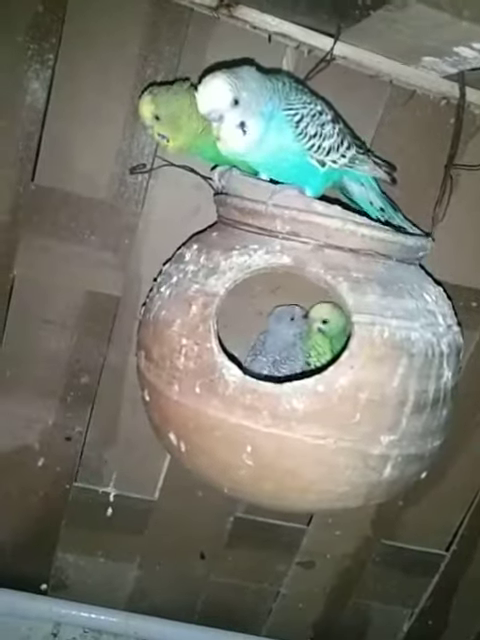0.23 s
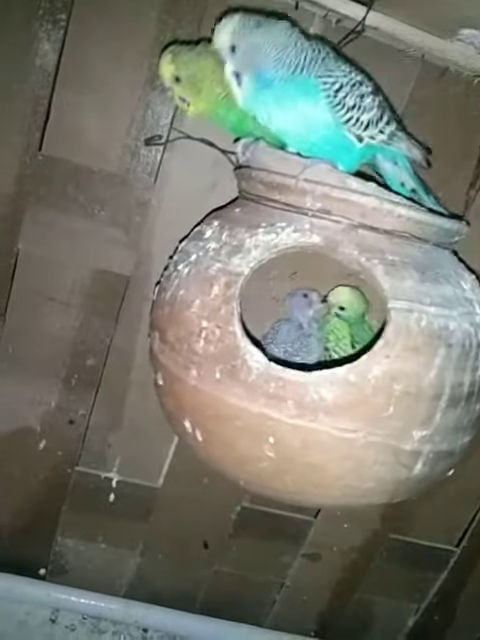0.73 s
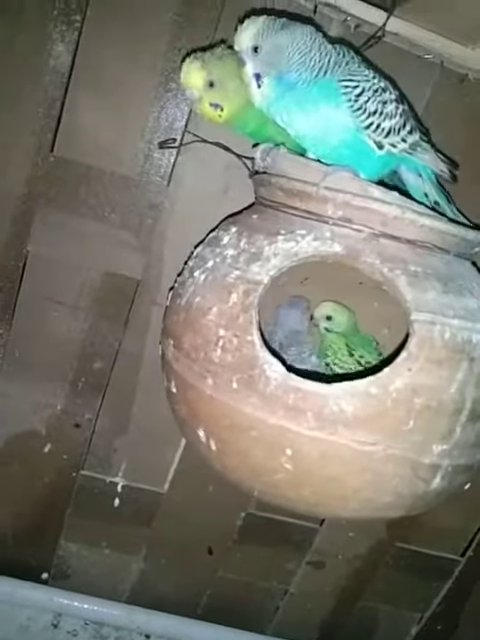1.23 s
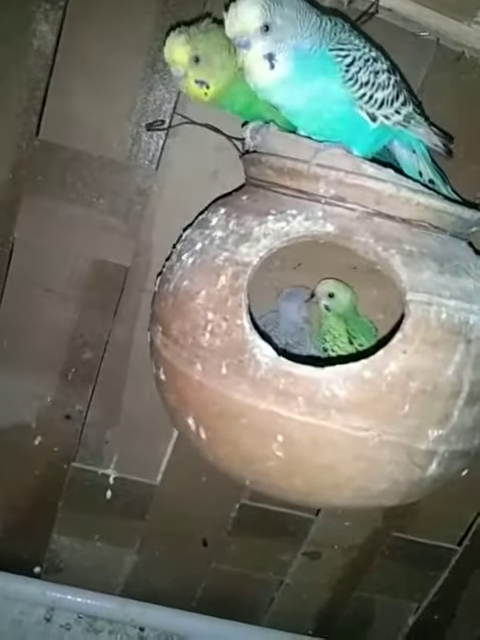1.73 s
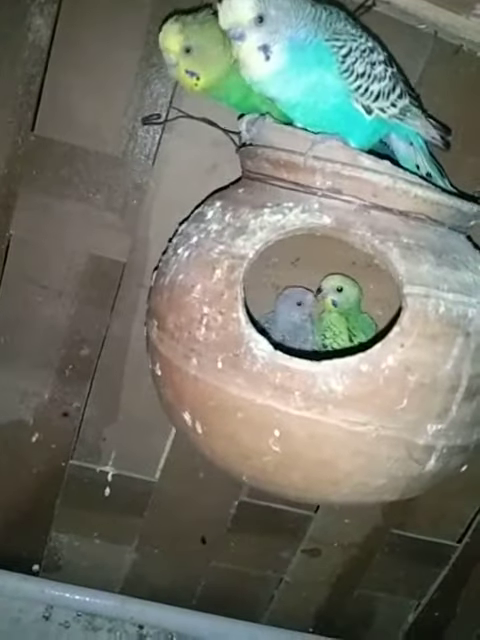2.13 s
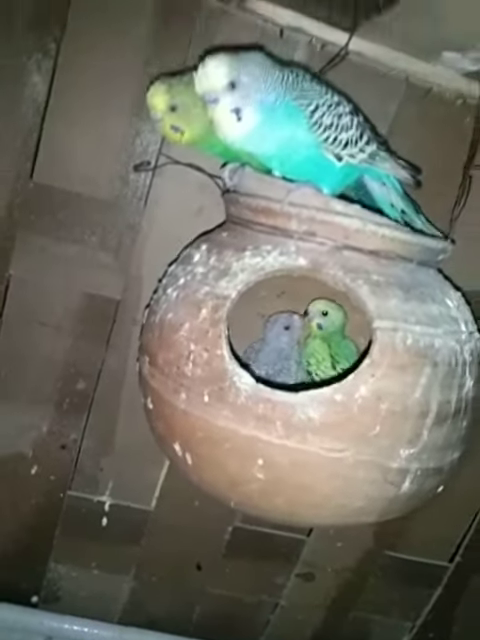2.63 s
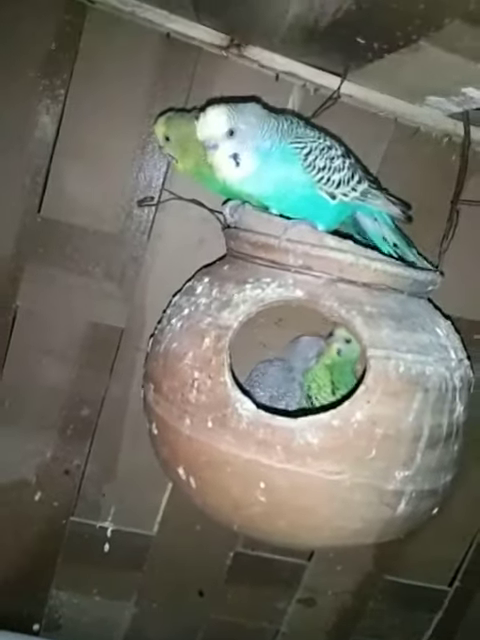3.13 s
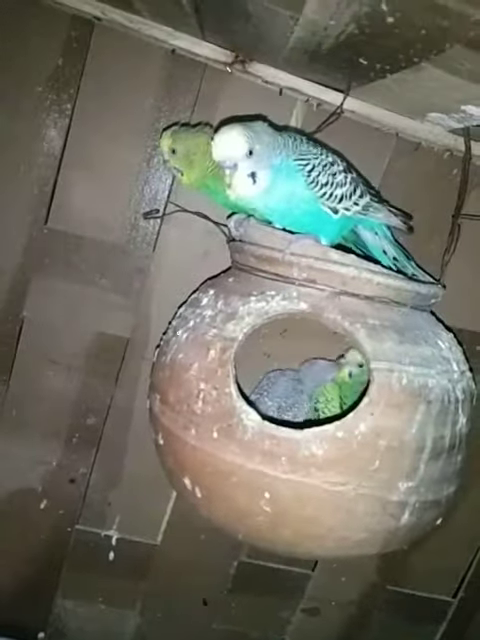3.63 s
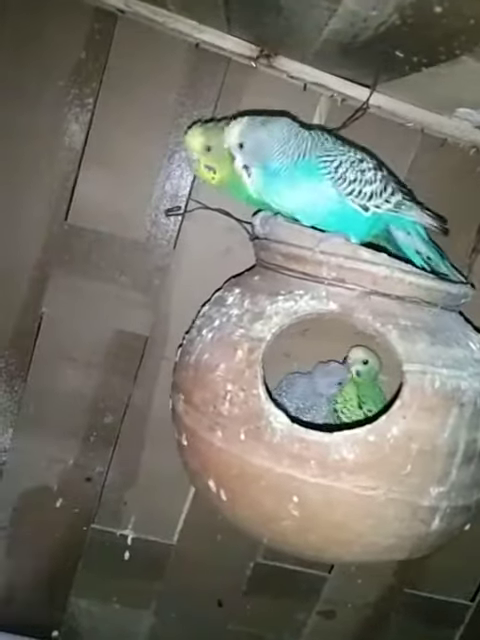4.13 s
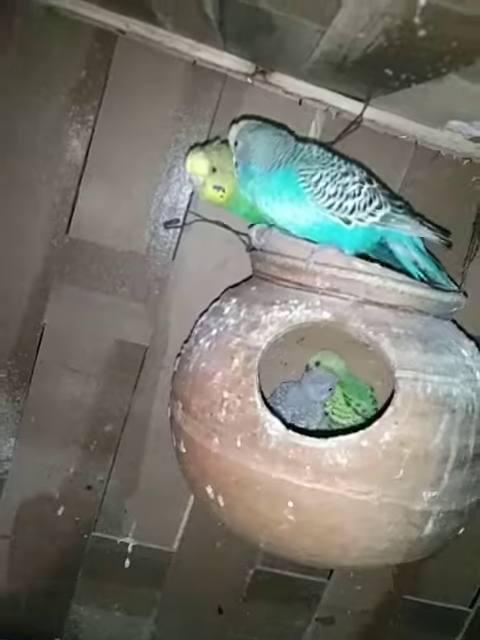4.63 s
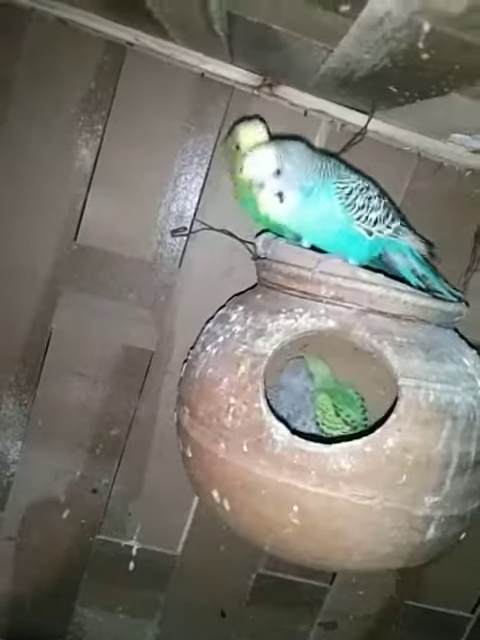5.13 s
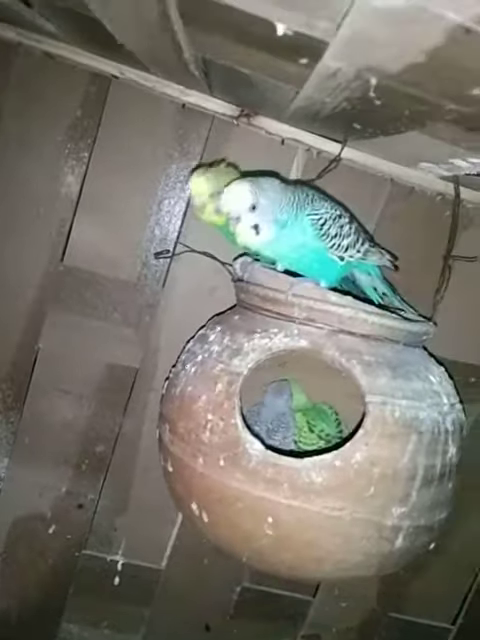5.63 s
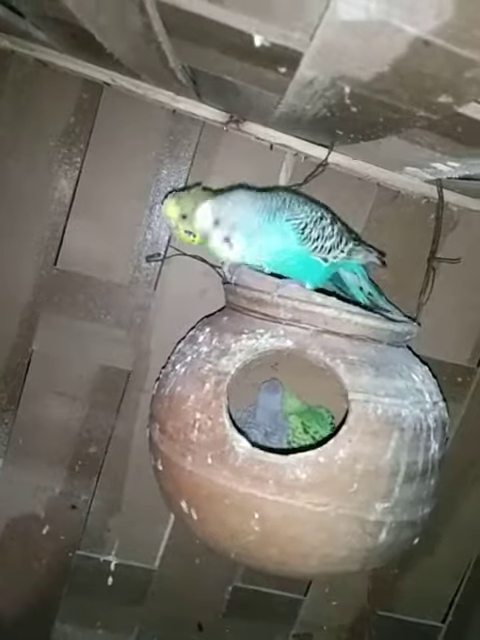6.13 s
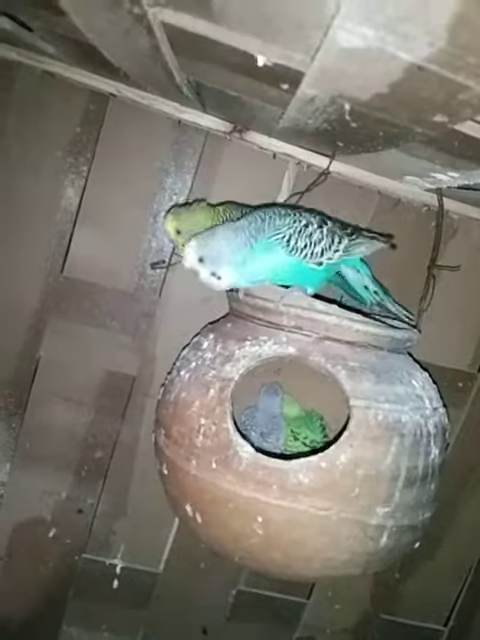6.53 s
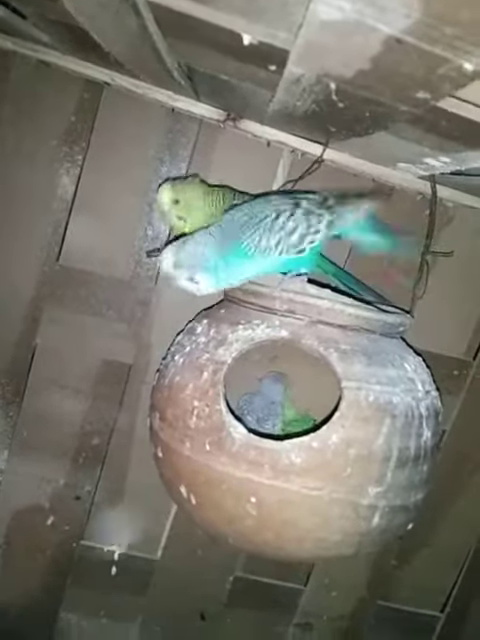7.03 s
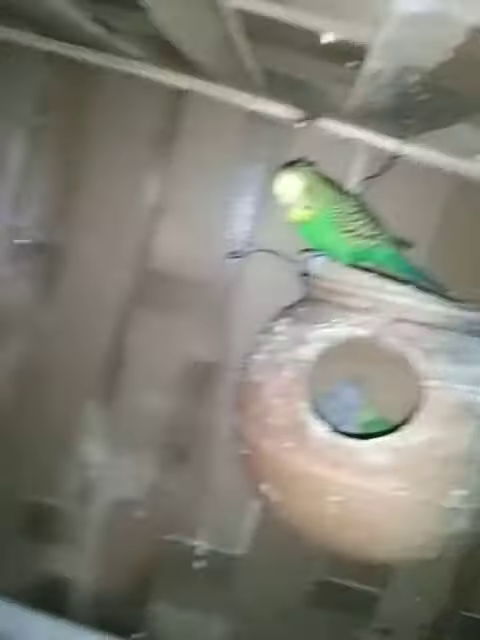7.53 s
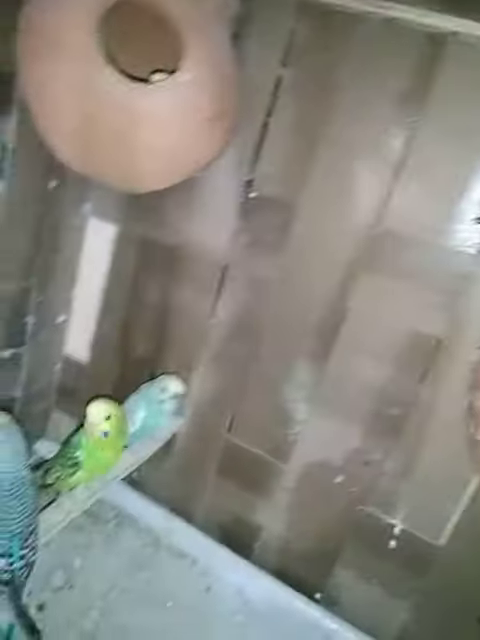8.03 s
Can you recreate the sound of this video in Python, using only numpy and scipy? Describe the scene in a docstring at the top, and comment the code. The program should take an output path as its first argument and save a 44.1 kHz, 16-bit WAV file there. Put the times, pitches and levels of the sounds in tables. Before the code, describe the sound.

A small parrot close by warbles, squawks and clucks in short lively bursts, chicks peep faintly from a clay pot, then wings flutter past.

```python
"""Budgerigars in a small brick aviary

A close bird warbles in gliding sine tones with overtones, squawks with trembling tones and rasping noise,
and clucks in short puffs of noise. Chicks peep from a clay nest pot: thin arching tones, run together.
Near the end a bird flies off past the microphone, in beating noise. Below lie a wavering hum, a low
rumble with soft bumps, and the drone of a motor far away. Random echoes add the walls.
"""
import sys
import numpy as np
from scipy import signal
from scipy.fft import rfft, irfft
from scipy.io import wavfile

SR = 44100
rng = np.random.default_rng(int(sys.argv[2]) if len(sys.argv) > 2 else 0)


def unload_wav(signal):
    """Save mono or channel-first audio to the path in sys.argv[1] as 16-bit WAV at rate SR, clipped to [-1, 1]."""
    wavfile.write(
        sys.argv[1],
        SR,
        np.round(np.clip(np.atleast_2d(signal).T, -1, 1) * 32767).astype(np.int16),
    )


N = 365148
TIME = np.arange(N) / SR


def from_db(db):
    """Turn decibels into a gain."""
    return 10 ** (np.asarray(db) / 20)


def rms_one(x):
    """Scale to unit power."""
    return x / np.sqrt(np.mean(np.abs(x) ** 2) + 1e-20)


def in_time(rows):
    """Draw each column of a table as a curve with a value at every sample."""
    seconds, *columns = np.transpose(rows)
    return [np.interp(TIME, seconds, column) for column in columns]


def add(out, start, sound):
    """Mix a sound in at a start time in seconds."""
    i = max(0, round(start * SR))
    out[i:i + len(sound)] += sound[:len(out) - i]


def wander(rate_hz, size):
    """Smooth random motion around zero, of unit power: a higher rate moves faster."""
    r = np.exp(-2 * np.pi * rate_hz / SR)
    settling = 8000  # samples dropped while the filter starts up
    motion = signal.lfilter([1], [1, -2 * r, r * r], rng.standard_normal(size + settling))
    return rms_one(motion[settling:])


def noise(spectrum):
    """Noise of unit power, shaped by a table of frequencies and levels."""
    table_hz, db = np.transpose(spectrum)
    hz = np.fft.rfftfreq(N, 1 / SR) + 1  # plus 1 avoids the logarithm of zero
    low_cut = hz / (hz + 20)
    gain = from_db(np.interp(np.log(hz), np.log(table_hz), db)) * low_cut
    return rms_one(irfft(rfft(rng.standard_normal(N)) * gain, N))


def cycles(hz):
    """Running phase of a moving frequency."""
    return 2 * np.pi * np.cumsum(hz) / SR


def gesture(length, pitches, attack, release):
    """One push of air: pitch bends through three points while the pressure rises, holds and lets go."""
    t = np.arange(int((length + 4 * release) * SR)) / SR
    bend = np.polyfit([0, .5, 1], pitches, 2)
    pitch = np.polyval(bend, np.minimum(t / length, 1))
    rise = 1 - np.exp(-(t / attack) ** 2)
    fall = np.exp(-np.maximum(t - length + release, 0) / release)
    return pitch, rise * fall


def puff(t, decay):
    """Strength of a short burst: it peaks at 1 after the decay time, then dies away."""
    return (t / decay) * np.exp(1 - t / decay)


def run_of(start, length, typical, unevenness=.18):
    """Split a bout into sounds of about the typical length, without gaps: starts and lengths."""
    count = max(1, round(length / typical))
    shares = np.exp(unevenness * rng.standard_normal(count))
    lengths = length * shares / shares.sum()
    return start + np.cumsum(lengths) - lengths, lengths


# Whistled notes that stand out of the warble: (time [s], length [s], start pitch [Hz], end pitch [Hz],
# relative level [dB], overtones relative to the note [dB])
WHISTLE_NOTES = [(.243, .033, 1605, 1404, -44.5, -2), (.278, 0.027, 1266, 1520, -38.5, -4),
                 (.32, 0.019, 1590, 1104, -45, -1.5), (0.412, 0.044, 870, 1362, -42, 0.5),
                 (.488, 0.041, 940, 1160, -55, -5.5), (0.548, 0.034, 1280, 1663, -44, 0.5),
                 (.706, .019, 2230, 3004, -31, 5.5), (1.138, .028, 3540, 2396, -25.5, -11),
                 (1.155, .023, 3140, 3990, -26.5, -21), (1.19, 0.036, 3020, 2876, -25, -24),
                 (2.332, 0.012, 2470, 2340, -28, 2), (2.376, 0.16, 1830, 1874, -45, -13),
                 (2.459, 0.063, 1680, 1396, -31, -4.5), (2.503, 0.022, 3060, 3770, -26, -7),
                 (2.567, 0.039, 2775, 3100, -28, -21), (2.641, 0.037, 1310, 2190, -31, -4),
                 (2.708, 0.028, 2710, 2500, -31, -15), (2.737, 0.041, 1822, 1410, -31.5, -10.5),
                 (2.776, .047, 1500, 1295, -33.5, -8), (2.965, 0.052, 3000, 1319, -30, -17.5),
                 (3.129, 0.045, 2715, 3150, -23, -27), (3.2, 0.04, 2015, 1340, -37.5, -1),
                 (3.272, 0.033, 2470, 3080, -26.5, -35), (3.311, 0.026, 2630, 2641, -23, -37),
                 (3.639, 0.086, 2795, 1455, -40, -7), (3.73, 0.027, 2970, 3633, -20, -17),
                 (3.765, 0.045, 3520, 2162, -19.5, -17.5), (3.797, 0.039, 2427, 3480, -19.5, -19),
                 (3.834, 0.033, 3160, 3055, -14.5, -13), (3.87, 0.054, 2263, 2926, -15.5, -13.5),
                 (4.142, 0.037, 3620, 3076, -25.5, 3), (4.179, 0.035, 3490, 3570, -19.5, -12.5),
                 (4.232, 0.046, 3077, 3104, -20.5, -19.5), (4.251, .041, 2840, 2436, -25, -5),
                 (4.293, 0.02, 2285, 1797, -46, 13), (4.627, 0.076, 3210, 1756, -39, -4),
                 (4.711, 0.053, 2690, 2403, -30, -6), (4.829, 0.038, 3320, 1960, -33, -4.5),
                 (4.903, 0.033, 3388, 3296, -19.5, -20), (4.932, .025, 2240, 3050, -26, -18),
                 (4.958, 0.024, 1633, 1480, -41, -4), (5.055, .032, 1727, 1390, -40, 0),
                 (5.145, 0.033, 1590, 1423, -40.5, -5), (5.187, .056, 2910, 1804, -40, -4),
                 (5.349, 0.067, 2800, 1466, -47.5, -9.5), (6.023, .072, 1667, 1365, -39.5, -7),
                 (6.86, 0.014, 3295, 3094, -32.5, -12.5), (6.882, 0.067, 4620, 2330, -32.5, -10.5),
                 (6.977, 0.041, 2972, 2953, -22, -7), (7.01, .037, 2587, 2554, -26, -5.5),
                 (7.081, 0.037, 2642, 3345, -24, -7.5), (7.45, 0.069, 1523, 1334, -33, -1.5),
                 (7.525, 0.039, 3060, 2370, -24.5, 0), (7.552, 0.034, 2973, 3216, -18, -22.5),
                 (7.6, 0.027, 1624, 1423, -38.5, -14), (7.672, 0.067, 1850, 1578, -38, 5)]


def whistles():
    """Clear notes: the longer and stronger a note is, the cleaner it sounds."""
    onset_rough, settle_s = .7, .06
    firm_db, rough_doubles_db = -25.5, 22.5  # roughness doubles for each 22.5 dB below a firm whistle
    notes = []
    for start, length, first_hz, last_hz, db, overtones_db in WHISTLE_NOTES:
        weakness = 2 ** ((firm_db - db) / rough_doubles_db)
        rough = min(1, onset_rough * np.exp(-length / settle_s) * weakness)
        notes.append((start, length, first_hz, last_hz, db, overtones_db, rough))
    return notes


# Bouts of softer chatter around the whistles: (time [s], length [s], central pitch [Hz], relative level [dB])
CHATTER_BOUTS = [(1.117, 0.069, 2434, -32.5), (2.45, .26, 2390, -35.5), (2.881, 0.24, 2197, -34.5),
                 (3.135, 0.19, 2353, -35), (3.529, 0.11, 1996, -49.5), (3.805, 0.019, 1904, -27),
                 (4.19, .065, 2435, -26), (4.715, .05, 2950, -32.5), (6.937, 0.067, 2290, -35),
                 (7.435, 0.026, 2600, -33)]
# Turning points of the chatter's pitch, in turn low, high, middle: (position in the swing [-1 to 1])
PITCH_TURNS = [-1, 1, 0]


def chatter():
    """Hoarse syllables join into a zigzag: each glides on from the pitch where the last one ended."""
    syllable_s, spread_db, rough = .041, 2, .62
    swing_oct, pitch_spread_oct = .36, .12
    # the further under the throat's resonance, the stronger the overtones
    throat_hz, throat_overtones_db, overtones_db_per_oct = 3110, -15.5, 11.5
    notes = []
    for bout_start, span, centre_hz, db in CHATTER_BOUTS:
        starts, lengths = run_of(bout_start, span, syllable_s)
        height, force = rng.standard_normal((len(starts) + 1, 2)).T
        # up in one syllable and down over two, with some chance in every turning point
        turns_oct = swing_oct * np.resize(PITCH_TURNS, len(height)) + pitch_spread_oct * height
        turns_hz = centre_hz * 2 ** turns_oct
        for start, length, first_hz, last_hz, push in zip(starts, lengths, turns_hz, turns_hz[1:], force):
            octaves_under = np.log2(throat_hz / np.sqrt(first_hz * last_hz))
            overtones_db = throat_overtones_db + overtones_db_per_oct * octaves_under
            notes.append((start, length, first_hz, last_hz, db + spread_db * push, overtones_db, rough))
    return notes


# Weight of the warble's overtones: (multiple of the pitch, relative level [dB])
OVERTONE_WEIGHTS = [(2, 1), (3, -5.5), (4, -16.5), (5, -11.5)]
# Tone colour of the air noise in warble and clucks: (frequency [Hz], relative level [dB])
AIR_SPECTRUM = [(300, -27), (700, -25), (1400, -2), (2600, 5.5), (4500, 5), (7000, -2), (10000, -19),
                (15000, -45)]


def warble(jitter=.059, jitter_hz=420, shimmer_db=6, flicker_db=5.5, hiss_db=-15):
    """Gliding notes; roughness shakes pitch and strength, wakes a second voice and lets air noise through."""
    voiced, hiss = np.zeros(N), np.zeros(N)
    quaver, twin_share, twin_spread = .04, .65, .17
    glide_done = .7  # share of its glide that a note has covered half way through
    for start, length, first_hz, last_hz, db, overtones_db, rough in whistles() + chatter():
        pitches = first_hz, first_hz + glide_done * (last_hz - first_hz), last_hz
        pitch, pressure = gesture(length + .002, pitches, attack=.0027, release=.003)
        n = len(pitch)
        fast_shake = jitter * rough * wander(jitter_hz, n)
        slow_shake = quaver * np.sqrt(rough) * wander(110, n)
        phase = cycles(pitch * (1 + fast_shake + slow_shake))
        upper = 0
        for multiple, weight_db in OVERTONE_WEIGHTS:
            # each overtone flares on its own as the throat moves; little passes above 9 kHz
            flare = rms_one(from_db(flicker_db * wander(67, n)))
            top_cut = 1 / np.sqrt(1 + (multiple * pitch / 9000) ** 20)
            upper = upper + from_db(weight_db) * flare * np.sin(round(multiple) * phase) * top_cut
        # a second membrane slips out of step and wanders above and across the first
        twin_hz = pitch * np.exp(twin_spread * (.5 + wander(35, n)))
        twin = np.sin(cycles(twin_hz)) * rms_one(from_db(flicker_db * wander(90, n)))
        voice = np.sin(phase) + from_db(overtones_db) * upper + twin_share * rough * twin
        shimmer = rms_one(from_db((-.5 + shimmer_db * rough) * wander(260, n)))
        add(voiced, start, from_db(db) * pressure * shimmer * voice * np.sqrt(2))
        add(hiss, start, from_db(db + hiss_db) * rough * pressure)
    return voiced + hiss * noise(AIR_SPECTRUM)


# Harsh squawks: (time [s], length [s], middle pitch [Hz], relative level of the octave [dB])
SQUAWK_CALLS = [(0.587, 0.051, 3290, -14), (0.71, 0.052, 3225, -16), (.796, .064, 3010, -16),
                (0.857, 0.051, 3220, -16), (0.958, .048, 3007, -16), (1.055, .071, 3060, -15),
                (1.232, 0.051, 3287, -15.5), (1.328, 0.064, 3134, -16), (3.946, 0.043, 3263, -14.5),
                (4.05, .097, 2874, -15.5), (4.77, 0.051, 3064, -14), (4.866, 0.052, 3303, -15.5),
                (4.972, 0.089, 3270, -15), (5.095, 0.056, 3080, -17), (5.25, 0.099, 2990, -17.5),
                (7.091, .04, 3054, -15.5), (7.307, 0.045, 2928, -14.5)]
# Tone colour of the rasp in squawks and peeps: (frequency [Hz], relative level [dB])
RASP_SPECTRUM = [(150, -21), (900, -24), (1500, -13), (2200, -16), (3400, 9.5), (4500, -1.5), (6000, -2),
                 (7500, 1), (8800, -1.5), (10500, -10.5), (13000, -19), (16000, -30)]


def squawks(rattle_hz=175, rattle_depth=.3, buzz_hz=680, buzz_depth=.65, swell=.008, release=.005):
    """The voice organ vibrates chaotically: two smeared tones and a wide rasp, chopped by an uneven rattle."""
    voiced, rasp = np.zeros(N), np.zeros(N)
    climb = .045  # share by which the pitch rises during a squawk
    rasp_db = -7
    # (multiple of the pitch, smearing rate in Hz, level in dB)
    partials = ((1, 150, -19), (2, 210, 0))
    for start, length, hz, octave_db in SQUAWK_CALLS:
        pitches = hz * (1 + climb * np.linspace(-.5, .5, 3))
        pitch, pressure = gesture(length + .005, pitches, attack=.0055, release=release)
        n = len(pitch)
        # a slower vibration bends the pitch to and fro, which splits each partial into sidebands
        buzz = cycles(buzz_hz * rng.uniform(.8, 1.25) * (1 + .074 * wander(40, n)))
        phase = cycles(pitch * (1 + .01864 * wander(49, n))) + buzz_depth * np.sin(buzz)
        slow_start = 1 - .7 * np.exp(-np.arange(n) / SR / swell)
        rattle = 1 + rattle_depth * np.cos(cycles(rattle_hz * (1 + .28 * wander(70, n))))
        pressure = pressure * slow_start * rattle
        for multiple, smear_hz, db in partials:
            cosine_part = wander(smear_hz, n) * np.cos(multiple * phase)
            sine_part = wander(smear_hz, n) * np.sin(multiple * phase)
            add(voiced, start - .004, from_db(octave_db + db) * pressure * (cosine_part + sine_part))
        add(rasp, start - .004, from_db(octave_db + rasp_db) * pressure)
    high_pass = signal.butter(2, 1500, "high", fs=SR, output="sos")
    return signal.sosfilt(high_pass, voiced) + rasp * noise(RASP_SPECTRUM)


# Dry clucks between the notes: (time [s], relative level [dB])
CLUCK_TIMES = [(0.258, -30.5), (0.415, -28), (2.225, -31), (2.238, -41), (2.271, -13), (2.279, -31),
               (2.337, -19), (2.346, -35), (2.445, -17), (2.883, -27.5), (3.518, -35.5), (4.55, -18),
               (5.196, -30), (5.228, -34), (6.864, -38), (7.439, -14), (8.01, -30.5)]


def clucks(decay=.0053, level_db=-9):
    """Single puffs of air noise that swell and fade within milliseconds."""
    puffs = np.zeros(N)
    t = np.arange(SR // 20) / SR
    for start, db in CLUCK_TIMES:
        add(puffs, start - .001, from_db(db + level_db) * puff(t, decay))
    return puffs * noise(AIR_SPECTRUM)


# The chicks beg in runs of peeps: (time [s], length [s], relative level [dB])
BEGGING_RUNS = [(0.052, 0.12, -63.5), (0.177, 0.21, -56), (1.486, 0.17, -58), (2.059, 0.16, -58.5),
                (3.361, 0.094, -48), (4.343, 0.22, -54.5), (5.427, 0.15, -56.5), (5.817, .223, -53.5),
                (6.249, 0.22, -48.5), (6.535, 0.35, -51.5), (7.773, 0.34, -53)]


def peeps():
    """Every run of begging is an uneven chain of peeps, the hurried ones higher."""
    typical_s, typical_hz = .062, 3810  # length and top pitch of a typical peep
    unevenness, hurry, spread_db = .3, .1, 2
    rows = []
    for run_start, span, db in BEGGING_RUNS:
        starts, lengths = run_of(run_start, span, typical_s, unevenness)
        tops_hz = typical_hz * (typical_s / lengths) ** hurry
        levels_db = db + spread_db * rng.standard_normal(len(starts))
        rows += zip(starts, lengths, tops_hz, levels_db)
    return rows


def chicks(dip_hz=3060, octave_db=-12, half_db=-23, dip_jitter=.048, rasp_db=-20, level_db=4):
    """Each peep arches up from a hoarse low pitch and drops back; run together they make a thin trill."""
    voiced, rasp = np.zeros(N), np.zeros(N)
    waver, flicker_db, fade = .03, 3, .009
    for start, length, top_hz, db in peeps():
        n = int((length + fade) * SR)
        t = np.arange(n) / SR
        # 1 at both ends of the peep, 0 in its middle
        dip = np.abs(np.cos(np.pi * np.linspace(0, 1, n))) ** 3
        arch_hz = top_hz + (dip_hz - top_hz) * dip
        shake = waver * wander(62, n) + dip_jitter * dip * wander(1200, n)
        phase = cycles(arch_hz * (1 + shake))
        fades = np.sqrt(np.clip(np.minimum(t, t[::-1]) / fade, 0, 1))
        strength = fades * from_db(db + level_db + flicker_db * wander(70, n))
        # in the dips the voice breaks to half its pitch
        half_pitch = from_db(half_db) * dip * np.sin(phase / 2)
        voice = np.sin(phase) + from_db(octave_db) * np.sin(2 * phase) + half_pitch
        add(voiced, start - fade / 2, strength * voice)
        add(rasp, start - fade / 2, strength * from_db(rasp_db))
    return voiced + rasp * noise(RASP_SPECTRUM)


# Air stirred by wings: (time [s], relative buffeting level [dB], relative feather swish level [dB])
WING_LEVELS = [(7.15, -62, -69), (7.266, -66, -60), (7.286, -53, -51), (7.37, -40.5, -46),
               (7.528, -48, -61.5), (7.69, -66, -63), (7.84, -64, -63.5), (7.884, -41, -62.5),
               (8.15, -65.5, -70)]
# Tone colour of the feathers: (frequency [Hz], relative level [dB])
FEATHER_SPECTRUM = [(100, -12), (350, -5), (600, -11.5), (1500, -13), (4000, -16), (8000, -10),
                    (15000, -39)]
# Tone colour of low noise, for wing buffeting, rumble and bumps: (frequency [Hz], relative level [dB])
RUMBLE_SPECTRUM = [(25, -18), (50, -11), (75, 0), (120, -4), (180, -14), (320, -28), (500, -40), (900, -47),
                   (6000, -55), (15000, -72)]


def wings(beat_hz=19, beat_db=4.5, buffet_db=-1, swish_db=5):
    """Every downstroke swishes and pushes air at the microphone: two noises that swell with the wingbeat."""
    buffet, swish = in_time(WING_LEVELS)
    flying = np.interp(TIME, [7.1, 7.15, 8.15, 8.28], [0, 1, 1, 0])
    beat = cycles(beat_hz * (1 + .0973 * wander(4.93, N)))
    strokes = from_db(beat_db * np.sin(beat))
    pushed_air = from_db(buffet + buffet_db) * noise(RUMBLE_SPECTRUM)
    feathers = from_db(swish + swish_db) * noise(FEATHER_SPECTRUM)
    return flying * strokes * (pushed_air + feathers)


# A motor far away: (time [s], pitch [Hz], level [dB])
MOTOR_COURSE = [(1.2, 123, -75.5), (1.8, 125.2, -72.5), (2.6, 133.5, -58.5), (3.3, 135.1, -62),
                (3.85, 125.6, -59), (4.2, 123, -89)]


def motor():
    """A low drone, one sine tone, that speeds up a little and sinks away."""
    hz, db = in_time(MOTOR_COURSE)
    return np.sqrt(2) * from_db(db) * np.sin(cycles(hz))


# Course of the background: (time [s], level [dB])
BACKGROUND_LEVEL = [(0, -64.5), (1.3, -69), (2.0, -63.5), (3.4, -60.5), (4.2, -66), (5.3, -68), (6.8, -60),
                    (8.28, -64)]
# Steady tones of the hum: (frequency [Hz], level relative to the background [dB])
HUM_TONES = [(74, 0), (100, -10), (124.5, -16.5)]
# Soft low bumps: (time [s], relative level [dB])
BUMP_TIMES = [(0.688, -46), (3.53, -39.5), (3.559, -43)]


def background(rumble_db=-1, bump_decay=.017, bump_top_hz=130):
    """Hum from sine tones that waver in pitch and level, over low noise, with a few soft bumps of noise."""
    bumps = np.zeros(N)
    t = np.arange(SR // 4) / SR
    for start, db in BUMP_TIMES:
        add(bumps, start, from_db(db) * puff(t, bump_decay))
    low_pass = signal.butter(2, bump_top_hz, fs=SR, output="sos")
    bumps = signal.sosfilt(low_pass, bumps * noise(RUMBLE_SPECTRUM))
    hum = np.zeros(N)
    for hz, db in HUM_TONES:
        strength = from_db(db + 2 * wander(1.7, N))
        hum += strength * np.sin(cycles(hz * (1 + .014 * wander(3.8, N))))
    level = from_db(in_time(BACKGROUND_LEVEL)[0])
    return level * (from_db(rumble_db) * noise(RUMBLE_SPECTRUM) + hum) + bumps


# Early reflections from pot and walls: (delay [s], level relative to the direct sound [dB])
EARLY_ECHOES = [(.0017, -32), (.0041, -16), (0.0105, -14)]


def aviary(x, tail_db, t60):
    """A few close reflections, a quick scatter from the corner of the cage, then a longer tail.

    Both are fading noise; t60 is the time in seconds in which the tail falls by 60 dB."""
    t = np.arange(SR // 2) / SR
    response = np.zeros(len(t))
    # level in dB, fall by 60 dB in s, build-up in s: the scatter, then the tail
    for db, decay, build_up in ((-8, .04, .001), (tail_db, t60, .006)):
        fading = from_db(-60 * t / decay) * (1 - np.exp(-t / build_up))
        diffuse = rng.standard_normal(len(t)) * fading
        response += from_db(db) * diffuse / np.linalg.norm(diffuse)
    response[0] = 1  # the direct sound
    for delay, db in EARLY_ECHOES:
        response[round(delay * SR)] += from_db(db)
    return signal.fftconvolve(x, response / np.linalg.norm(response))[:N]


def scene():
    """The close bird, the chicks further off, then wings, motor and background without echoes."""
    close = aviary(warble() + squawks() + clucks(), tail_db=-26.5, t60=.29)
    nest = aviary(chicks(), tail_db=-9.5, t60=.33)
    return (close + nest + wings() + motor() + background())[None]


def record(dry):
    """Peaks are rounded softly and everything above 16450 Hz is cut."""
    low_pass = signal.ellip(10, .2, 70, 16450, fs=SR, output="sos")
    return signal.sosfilt(low_pass, np.tanh(dry))


dry = scene()
out = record(dry)
unload_wav(out)
```